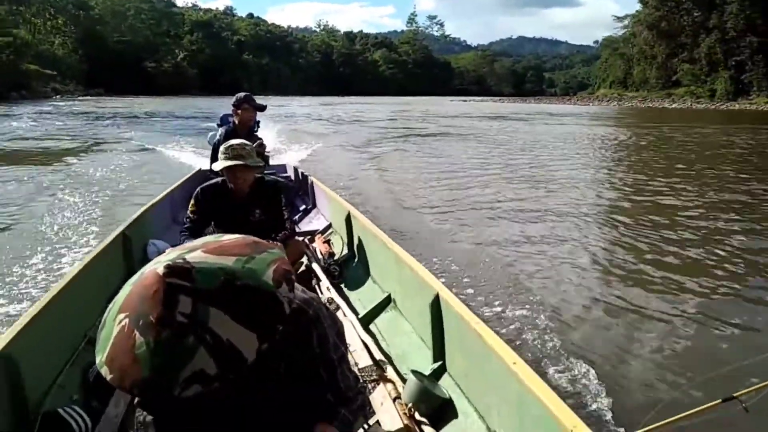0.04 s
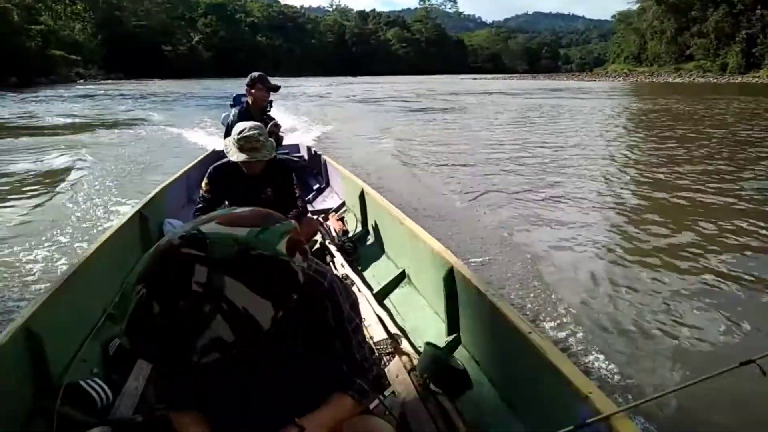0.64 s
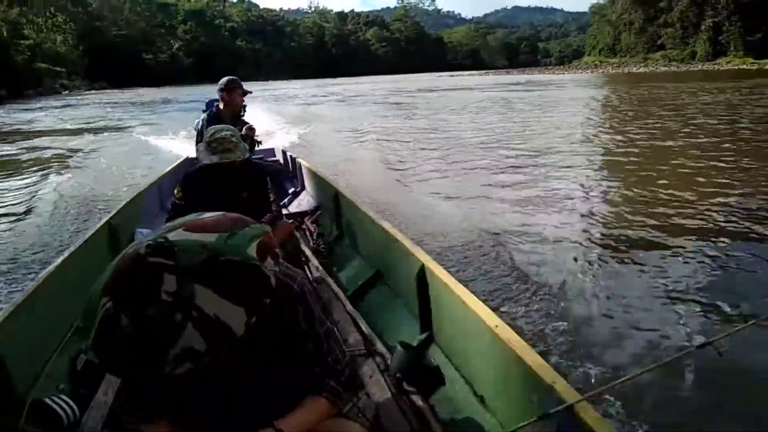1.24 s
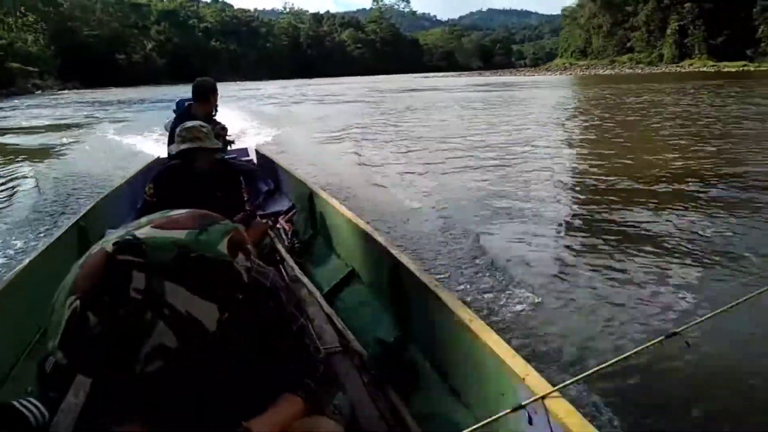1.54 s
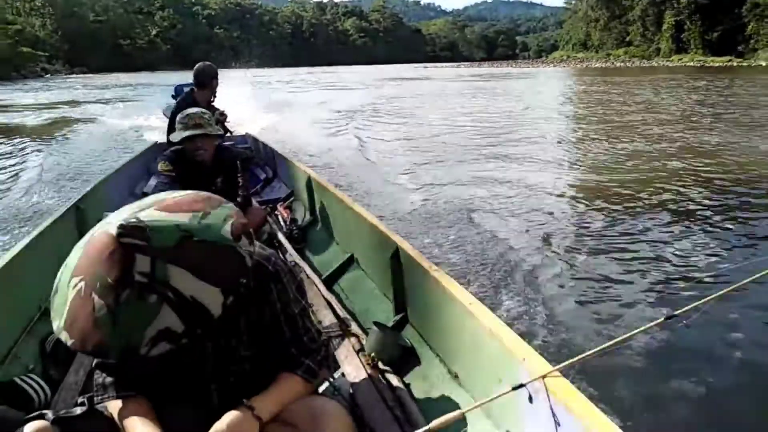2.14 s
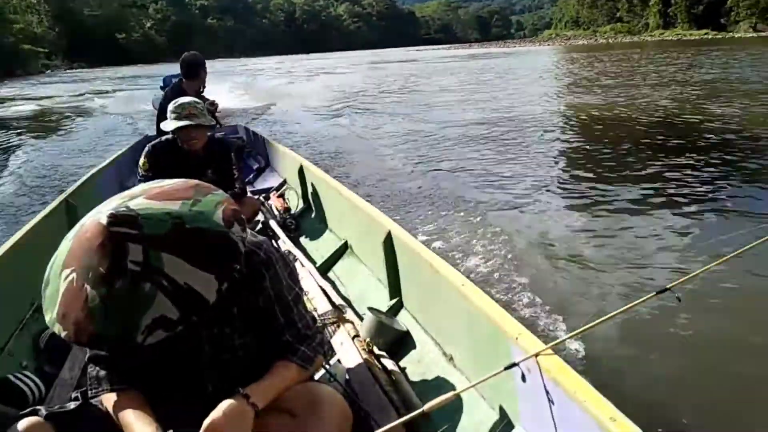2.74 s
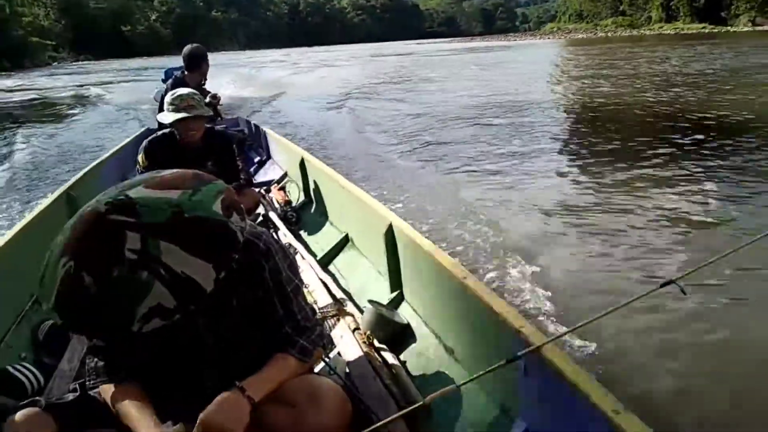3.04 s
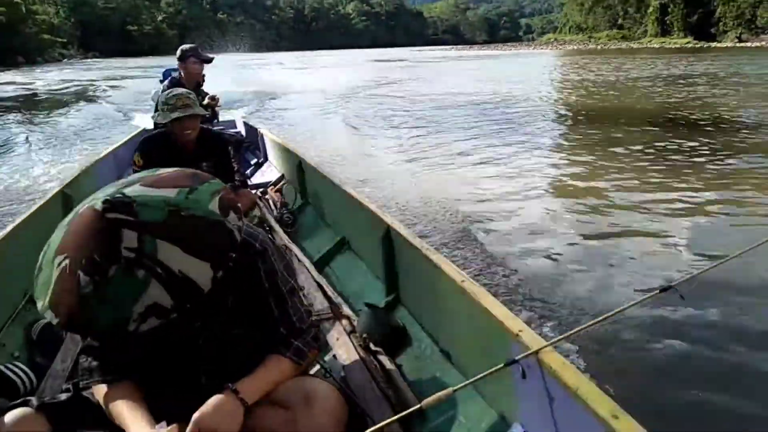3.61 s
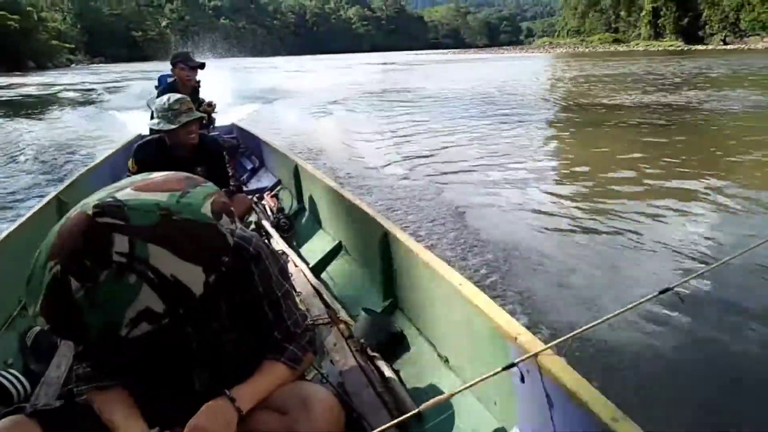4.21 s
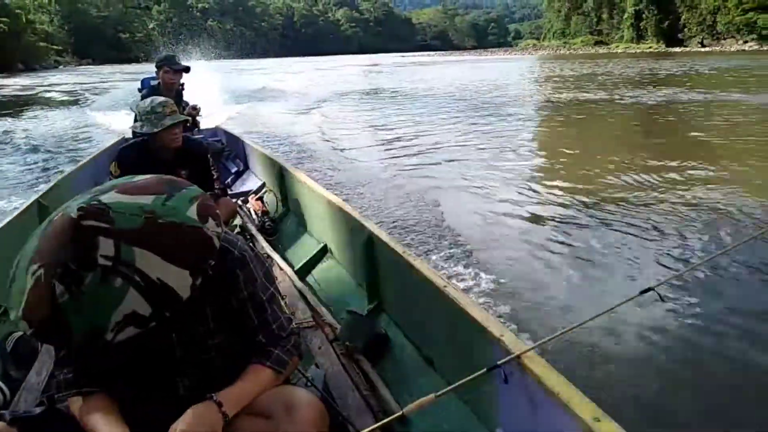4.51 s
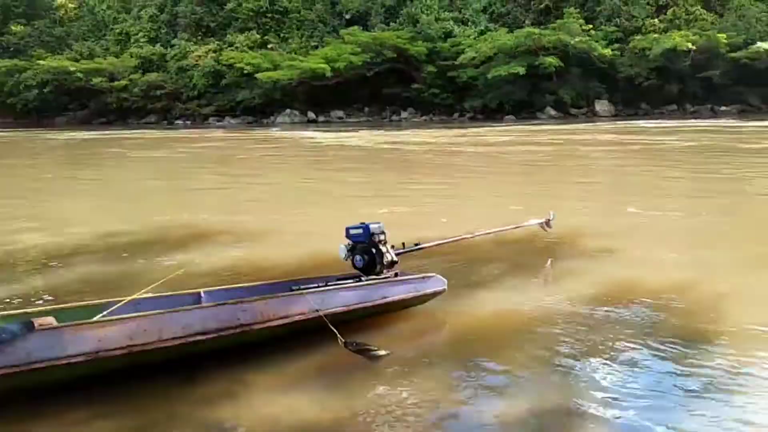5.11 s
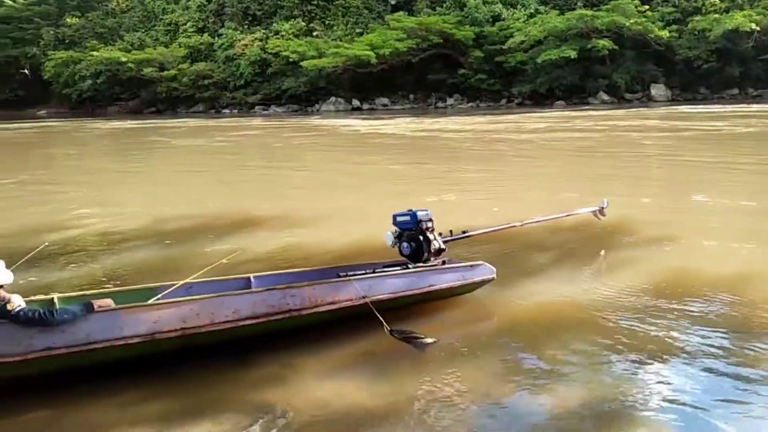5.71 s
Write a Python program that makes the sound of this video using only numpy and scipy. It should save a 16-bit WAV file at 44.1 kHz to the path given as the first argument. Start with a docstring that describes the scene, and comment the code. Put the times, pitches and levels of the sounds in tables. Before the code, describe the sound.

A small boat motor chugs and clatters, then speeds up over rushing water and gusty microphone wind before cutting off abruptly.

```python
"""A small outboard motor drives a wooden longboat up a river, heard from the bow, and speeds up.
Each beat of the motor is a low exhaust thump, a hard clack of the casing, then a short spit of hiss.
Water rushes along the hull and wind buffets the microphone, now and then with a brief thud,
until everything stops abruptly."""
import sys
import numpy as np
from scipy import signal
from scipy.fft import rfft, irfft
from scipy.io import wavfile
from scipy.ndimage import uniform_filter1d

SR = 44100
rng = np.random.default_rng(int(sys.argv[2]) if len(sys.argv) > 2 else 0)


def to_wav(sig):
    """Store sig (one row per channel, or 1-D mono) as 16-bit WAV at the path in sys.argv[1].

    Samples outside -1..1 are clipped; the rate is SR.
    """
    pcm = np.clip(np.atleast_2d(sig), -1, 1) * 32767
    pcm = np.round(pcm).astype(np.int16)
    wavfile.write(sys.argv[1], SR, pcm.T)  # frames by channels


N = 253575
STOP_S = 5.357
TIME = np.arange(N) / SR
HZ = np.fft.rfftfreq(N, 1 / SR)
LEAD = 512  # samples of a beat that come before the middle of its thump
AGE = (np.arange(5 * LEAD) - LEAD) / SR  # seconds from the middle of a thump

# Pitches at which the motor casing rings: pitch_hz, width_hz, lift_db
CASING_RINGS = [(430, 60, 5), (745, 50, 7.5), (930, 60, 5), (1168, 100, 6), (1457, 75, 6.5), (1835, 150, 3),
                (2368, 130, 4)]


def exhaust():
    """The exhaust gives a deep push and rings its pipe; a higher thump takes over as the throttle opens."""
    thump_db = throttle_db(shut_db=-26.5, added_db=6.76, power=5.22)
    load = throttle()
    beats = firings(scatter_db=1.58)
    deep_swing = swing(hz=133, delay_s=.0001, length_s=.0025)
    after_kick = swing(hz=186, delay_s=.00657, length_s=.0008)
    push = play(beats, deep_swing + 2 * after_kick)
    thump = play(beats, swing(hz=284, delay_s=.0001, length_s=.003))
    pipe = play(firings(scatter_db=-.4), ring(hz=311.8, delay_s=.00779, decay_s=.0074))
    pulses = (gain_of(3.5 - 7.5 * load) * push
              + gain_of(-10 + 12.24 * load) * thump
              + gain_of(-4 - 10 * load) * pipe)
    muffled = irfft(rfft(pulses) / (1 + (HZ / 430) ** 10), N)  # the muffler cuts above 430 Hz
    planks = play(firings(scatter_db=1), ring(hz=431, delay_s=.012, decay_s=.014))  # boom under load
    return gain_of(thump_db) * (muffled + gain_of(-24.5 + 5.1 * load) * planks)


def clack():
    """A sharp knock, firmer under load, shakes the casing into a clanking rattle that lingers faintly."""
    # Tone of the rattle: pitch_hz, level_db
    rattle_tone = [(250, -28), (420, -2), (560, -17), (660, -14.5), (780, 1.5), (1000, -4), (1200, 5),
                   (1500, 5), (1900, 5.5), (2600, -4.5), (2900, -23), (3600, -33), (5000, -37.5),
                   (8000, -62)]
    clack_db = throttle_db(shut_db=-29.5, added_db=4.2, power=5.8) + strike_db()
    load = throttle()
    knock = play(firings(scatter_db=1), swing(hz=1320, delay_s=.005266, length_s=.0006))
    rattle = bursts(noise(rattle_tone, CASING_RINGS), .84 * beat_decay(), delay_s=.0037, rise_s=.0023,
                    scatter_db=3, colour_db=18.5, patch_hz=379)
    tail_shape = play(firings(scatter_db=4.5), puff(delay_s=.0061, rise_s=.0024, decay_s=.011))
    tail = tail_shape * noise(rattle_tone, CASING_RINGS)
    blow = gain_of(-17 + 11 * load) * knock + gain_of(-2.5 - 1.6 * load) * rattle
    return gain_of(clack_db) * (blow + gain_of(-11) * tail + gain_of(-5) * clanks())


def strike_db():
    """How much harder or softer than usual the casing is struck."""
    # Slow changes in the rattling: time_s, extra_db
    rattling = [(0, 0.5), (1.25, -1), (1.42, -3.5), (1.65, 0), (2.7, 1.5), (3.0, 0.5), (3.6, 1.5),
                (4.18, -4), (4.3, -1), (4.85, 3), (5.3, 0)]
    # Single strokes that knock harder: time_s, extra_db
    hard_knocks = [(.487, 2), (.942, 3), (1.267, 4.5), (1.748, 5.5), (2.391, 3), (2.707, 2), (2.909, 1),
                   (4.85, 2)]
    reach_s = .022  # about half a beat
    knocks_db = sum(db * np.exp(-((TIME - s) / reach_s) ** 4) for s, db in hard_knocks)
    return curve(rattling) + knocks_db + .7 * wander(rate_hz=9.6)


def clanks(low_hz=1150, high_hz=2600, count=2):
    """Loose metal rings briefly at random pitches on each beat, reaching higher under load."""
    beats, out = firings(scatter_db=.95), np.zeros(N + len(AGE))
    top_hz = high_hz * (1 + .3 * throttle())
    for at in np.flatnonzero(beats):
        pitches = low_hz * (top_hz[at] / low_hz) ** rng.beta(2, 2, count)
        sizes = rng.rayleigh(1, count)
        clank = sum(size * ring(hz, delay_s=.0046, decay_s=.0052) for hz, size in zip(pitches, sizes))
        out[at:at + len(AGE)] += beats[at] * clank / np.linalg.norm(clank)
    return out[LEAD:LEAD + N]


def spit():
    """Gas and spray hiss out after each thump, louder as the motor works harder."""
    # Tone of the hiss: pitch_hz, level_db
    hiss_tone = [(1800, -39), (3000, -6), (4200, -10), (5200, -7.5), (6300, -7), (7200, -1), (8200, 4),
                 (9300, 3.5), (10500, -1), (12200, -4), (13300, 0.5), (14500, -10)]
    # Thin ringing bands in the hiss: pitch_hz, width_hz, lift_db
    sizzle = [(5256, 36, 11), (6160, 430, 3.5), (7860, 190, 2), (11600, 170, 4.5), (12000, 200, 6.5)]
    spit_db = throttle_db(shut_db=-28.6, added_db=6.1, power=.55) + .54 * wander(rate_hz=2.7)
    hiss = bursts(noise(hiss_tone, sizzle), .75 * beat_decay(), delay_s=.0047, rise_s=.0021,
                  scatter_db=-.23, colour_db=8.5, patch_hz=454.6)
    return gain_of(spit_db + .92 * wander(rate_hz=440)) * hiss


def firings(scatter_db):
    """The motor fires once a turn: one click a beat, each of a slightly random size."""
    # Motor speed: time_s, beats_per_s
    motor_speed = [(0.0, 16.63), (0.59, 17.257), (1.19, 18.746), (1.47, 18.817), (1.75, 18.415),
                   (2.06, 18.789), (2.47, 18.596), (3.43, 22.242), (3.72, 22.434), (4.13, 24.069),
                   (4.93, 25.672), (5.36, 25.416)]
    speed = curve(motor_speed)
    turns = np.floor(np.cumsum(speed) / SR - .123)  # the first beat comes .123 of a turn in
    at = np.flatnonzero(np.diff(turns))
    at = at[TIME[at] < STOP_S - .02]
    clicks = np.zeros(N)
    # Faster clicks are smaller, so speed alone adds no loudness.
    clicks[at] = np.sqrt(SR / speed[at]) * gain_of(scatter_db * rng.standard_normal(len(at)))
    return clicks


def throttle():
    """How far the throttle is open at every sample, from 0 (shut) to 1 (wide open)."""
    # Throttle position: time_s, fraction_open
    positions = [(0, 0.03), (2.3, 0), (2.8, 0.35), (3.65, 0.62), (4.2, 0.97), (5.3, 0.96)]
    return np.clip(curve(positions), 0, 1)


def throttle_db(shut_db, added_db, power):
    """A level that grows with the throttle; a high power holds the growth back until nearly wide open."""
    return shut_db + added_db * throttle() ** power


def beat_decay():
    """The base time in seconds from which the rattle and the spit take their dying away."""
    # Base fading time: time_s, decay_s
    decays = [(0, 0.0064), (1.2, 0.0074), (2.2, 0.0051), (2.8, .009), (3.5, 0.01), (4.1, 0.011),
              (5.3, 0.0079)]
    return curve(decays)


def water():
    """The bow wave rushes as the boat gathers pace, and the hull throws fine spray."""
    # Swelling and sinking of the bow wave: time_s, level_db
    bow_wave = [(0, -34.5), (.4, -34.5), (.85, -32.5), (1.6, -33.5), (2.7, -33.5), (3.5, -31), (4.2, -29.5),
                (4.8, -28), (5.3, -29)]
    # Tone of the rushing water: pitch_hz, level_db
    rush_tone = [(200, -7.5), (420, -2.5), (540, -3), (660, -8), (850, -4), (1150, -1.5), (1500, -2.5),
                 (2000, -2), (2500, -4), (3000, -7.5), (4000, -13.5), (5500, -27), (9000, -80)]
    # Tone of the spray: pitch_hz, level_db
    spray_tone = [(2500, -32), (4000, -6), (5200, -9), (6500, -3.5), (7600, -0.5), (8700, 1.5), (9700, 0),
                  (10800, -6.5), (12400, -8.5), (14500, -20)]
    rush = gain_of(curve(bow_wave) - .5 + wander(rate_hz=33)) * noise(rush_tone, CASING_RINGS)
    spray_db = throttle_db(shut_db=-38.6, added_db=6.1, power=.77) + .44 * wander(rate_hz=150)
    return rush + gain_of(spray_db) * noise(spray_tone)


def wind():
    """Wind on the microphone makes a deep rumble and a higher, lumpy buffeting; both swell in gusts."""
    # Tone of the buffeting: pitch_hz, level_db
    buffet_tone = [(20, -38), (50, -5), (80, -1.5), (120, 0.5), (175, -2.5), (230, -12.5), (330, -17.5),
                   (480, -28.5), (800, -32), (1600, -61.5)]
    # Tone of the rumble: pitch_hz, level_db
    rumble_tone = [(15, -27), (30, -22), (48, -13), (65, 7), (90, -1.5), (140, -12.5), (300, -44.5)]
    # Slow changes in the rumble: time_s, level_db
    rumble_levels = [(0, -29.5), (1.3, -24.5), (1.7, -35), (3.0, -40), (4.2, -35.5), (4.8, -33), (5.3, -34)]
    wind_db = gusts_db()
    lumps_db = 1.6 * wander(rate_hz=25)
    buffet = gain_of(wind_db - 2.27 + lumps_db) * noise(buffet_tone)
    rumble_db = curve(rumble_levels) + .67 * (wind_db - wind_db.mean()) + 2.2 * lumps_db
    return buffet + gain_of(rumble_db) * noise(rumble_tone)


def gusts_db():
    """Strength of the wind: each gust swells and falls on top of the breeze."""
    # Gusts: peak_s, length_s, level_db
    gusts = [(0.063, 0.053, -15), (0.145, 0.11, -23), (0.422, 0.12, -24), (0.567, 0.078, -16),
             (0.753, 0.093, -16), (0.933, 0.097, -28), (1.363, 0.11, -28), (1.7, .1, -22),
             (1.932, 0.084, -19.5), (2.2, 0.37, -20), (2.378, 0.039, -15), (2.645, 0.24, -21),
             (3.03, 0.16, -20.5), (3.48, .12, -26)]
    # The breeze between gusts: time_s, level_db
    breeze_levels = [(0, -36), (1.5, -30.5), (2.2, -24.5), (2.9, -20), (3.4, -27.5), (4.3, -26.5),
                     (5.3, -25)]
    swells = sum(gain_of(db) * np.exp(-(2 * (TIME - s) / length) ** 2) for s, length, db in gusts)
    breeze = gain_of(curve(breeze_levels) + 2.4 * wander(rate_hz=9.9))
    return 20 * np.log10(breeze + swells)


def buffet_thuds():
    """Strong wind buffets thud briefly on the microphone, each with a short note falling in pitch."""
    # Thuds of wind: start_s, level_db, base_pitch_hz
    thuds = [(0.737, -27, 469), (1.652, -30, 545), (2.24, -30.5, 476), (2.484, -31, 518), (2.625, -26, 437)]
    out = np.zeros(N)
    for start_s, db, hz in thuds:
        age = np.maximum(TIME - start_s, 0)
        cycles = hz * age * (.8 + .39 * np.exp(-age / .33))
        loudness = (1 - np.exp(-age / .002)) * np.exp(-age / .029)
        out += gain_of(db) * np.sin(2 * np.pi * cycles) * loudness
    return out


def drifting(hiss, width_hz=750, patchy_db=2):
    """The tone of the hiss shifts: a moving dip and small, passing louder and softer patches."""
    # A dip in the treble that drifts and at times fills in: time_s, centre_hz, change_db
    dip = [(0, 4100, -5.5), (.5, 4000, -11.5), (1.102, 3900, -13.5), (1.6, 4900, -6.5), (2.1, 5100, -1),
           (2.5, 5040, -7), (2.9, 4300, 3), (4.4, 4500, -5.5), (5.301, 4270, -1.5)]
    hz, times, spectrum = signal.stft(hiss, SR, nperseg=256)
    dip_s, centre_hz, change_db = np.transpose(dip)
    distance_hz = hz[:, None] - np.interp(times, dip_s, centre_hz)
    dip_db = np.interp(times, dip_s, change_db) * np.exp(-.5 * (distance_hz / width_hz) ** 2)
    patches = uniform_filter1d(rng.standard_normal(spectrum.shape), size=3, axis=0)  # blur in pitch
    patches = evened(uniform_filter1d(patches, size=14, axis=1))  # blur in time
    return signal.istft(spectrum * gain_of(dip_db + patchy_db * patches), SR, nperseg=256)[1][:N]


def bursts(source, decay_s, delay_s, rise_s, scatter_db, colour_db, patch_hz):
    """Cuts a puff out of a noise at every beat, each with its own random length and tone colour."""
    beats, out = firings(scatter_db), np.zeros(N + len(AGE))
    hz = np.fft.rfftfreq(len(AGE), 1 / SR)
    variation = np.clip(hz / 1500, 0, 1) ** 2  # low notes vary least
    for at in np.flatnonzero(beats):
        late, longer = rng.standard_normal(2)
        patches = np.interp(hz / patch_hz + rng.random(), np.arange(200), rng.uniform(-1, 1, 200))
        burst = irfft(rfft(source[at:at + len(AGE)]) * gain_of(colour_db * variation * patches))
        burst *= puff(delay_s + .00015 * late, rise_s, decay_s[at] * np.exp(.06 * longer))
        out[at:at + len(AGE)] += beats[at] * burst / np.linalg.norm(burst)
    return out[LEAD:LEAD + N]


def play(clicks, shape):
    """Sounds a short shape, scaled to an energy of 1, at every click."""
    return signal.oaconvolve(clicks, shape / np.linalg.norm(shape))[LEAD:LEAD + N]


def swing(hz, delay_s, length_s):
    """A brief swing of air pressure around a central dip."""
    age = AGE - delay_s
    return -np.cos(2 * np.pi * hz * age) * np.exp(-.5 * (age / length_s) ** 2)


def ring(hz, delay_s, decay_s):
    """One fading note of something struck."""
    return np.sin(2 * np.pi * hz * (AGE - delay_s)) * puff(delay_s, .000083, decay_s)


def puff(delay_s, rise_s, decay_s):
    """A loudness shape that opens quickly and dies away."""
    age = np.maximum(AGE - delay_s, 0)
    return (1 - np.exp(-(age / rise_s) ** 2)) * np.exp(-age / decay_s)


def noise(tone, rings=()):
    """Noise with a smooth tone, lifted at any ringing pitches."""
    pitches, db = np.transpose(tone)
    level_db = np.interp(np.log(HZ + 1), np.log(pitches + 1), db)
    for hz, width_hz, lift_db in rings:
        level_db += lift_db / (1 + (2 * (HZ - hz) / width_hz) ** 2)
    return evened(irfft(rfft(rng.standard_normal(N)) * gain_of(level_db), N))


def wander(rate_hz):
    """A smooth random wobble of typical size 1."""
    return evened(irfft(rfft(rng.standard_normal(N)) * np.exp(-(HZ / rate_hz) ** 2), N))


def curve(rows):
    """Joins (time_s, value) points with straight lines, giving a value at every sample."""
    return np.interp(TIME, *np.transpose(rows))


def evened(x):
    """Scales a signal to a typical size (root mean square) of 1."""
    return x / np.sqrt(np.mean(x ** 2) + 1e-20)


def gain_of(db):
    """Turns decibels into a number to multiply by."""
    return 10 ** (np.asarray(db) / 20)


def scene():
    """Motor, water and wind in one channel."""
    # The whole motor sounds a little louder or softer at the bow: time_s, level_db
    motor_levels = [(0, -1.5), (.85, -.5), (1.2, 2), (1.5, 0.1), (2.7, 0.26), (3.3, 1.5), (4.0, 1.5),
                    (5.03, -0.5), (5.15, -3.5), (5.3, -2.5)]
    motor_gain = gain_of(curve(motor_levels))
    motor = motor_gain * (exhaust() + clack())
    hiss = drifting(motor_gain * spit() + water())
    return (motor + hiss + buffet_thuds() + wind())[None]


def record(dry):
    """Cuts the deepest bass, fades quickly into the stop, rounds the peaks and cuts the highest treble."""
    dry = signal.lfilter(*signal.butter(2, 32, "high", fs=SR), dry)
    fade_db = np.interp(TIME, [5.29, 5.325, 5.35], [0, -7, -18])
    faded = dry * gain_of(fade_db) * np.clip((STOP_S - TIME) / .002, 0, 1)
    ceiling, top_hz = .8, 14500
    rounded = faded / (1 + (faded / ceiling) ** 4) ** .25
    treble_cut = signal.firwin(201, top_hz, window=("kaiser", 7), fs=SR)
    return signal.oaconvolve(rounded, treble_cut[None], "same")


dry = scene()
out = record(dry)
to_wav(out)
```